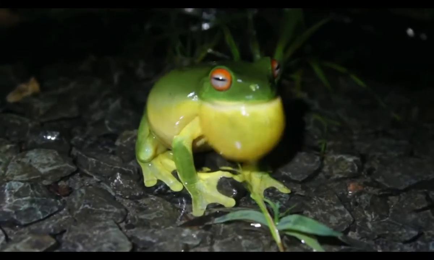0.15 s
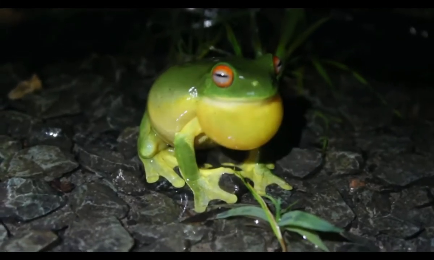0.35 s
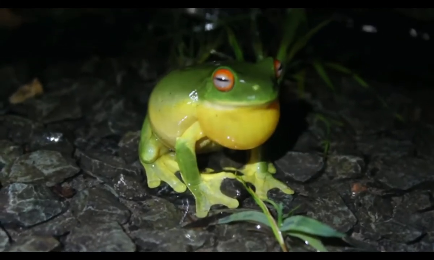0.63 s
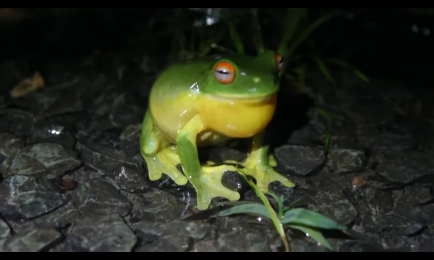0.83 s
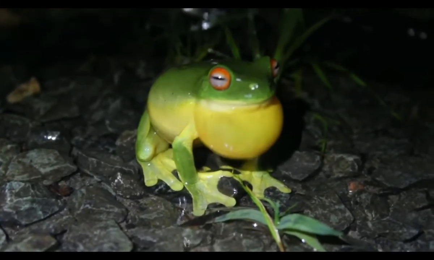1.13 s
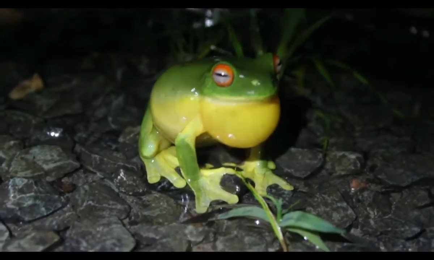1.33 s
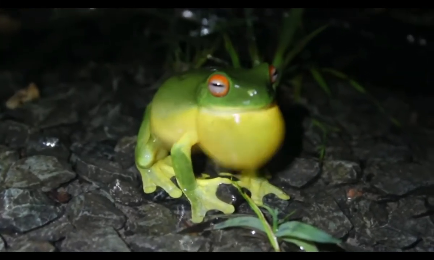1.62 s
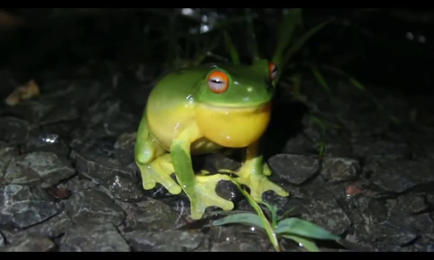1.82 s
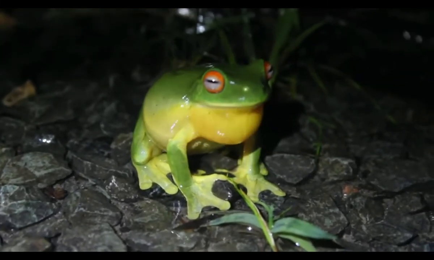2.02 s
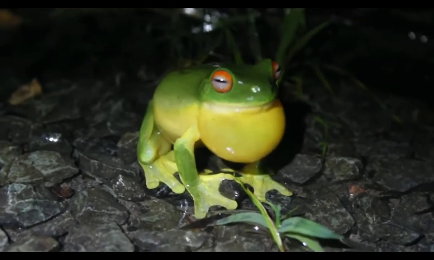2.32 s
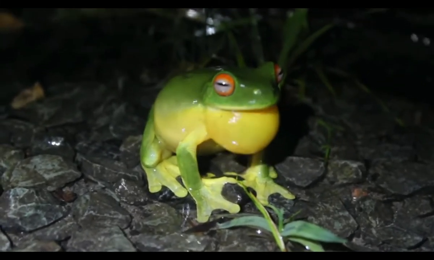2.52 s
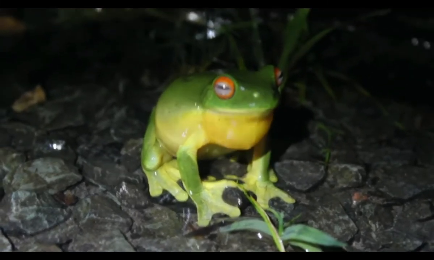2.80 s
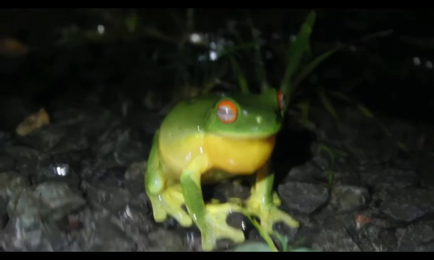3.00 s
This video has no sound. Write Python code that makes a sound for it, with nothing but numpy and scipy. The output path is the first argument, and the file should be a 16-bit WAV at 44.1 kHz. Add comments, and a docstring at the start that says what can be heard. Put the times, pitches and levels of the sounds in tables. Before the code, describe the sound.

Tree frog calling at night: three swelling nasal moans, short creaky trills between, hissy background

```python
"""Tree frogs at night

On wet gravel, one frog gives three long buzzing moans that swell, rise and sag: harmonics shaped by a throat.
A second frog cuts in with four trills of short falling notes, made the same way, with loose creaking pulses.
Filtered noise echoes both. Behind them are shaped noise for a steady hiss, a patter and a far chorus,
a high chirr of sine pips, ticks like drips made of noise bursts, and soft bumps made of filtered clicks."""
import sys
import numpy as np
from scipy import signal
from scipy.fft import rfft, irfft
from scipy.io import wavfile

SR = 44100
rng = np.random.default_rng(int(sys.argv[2]) if len(sys.argv) > 2 else 0)


def pcm_store(signal):
    """Save signal as 16-bit PCM."""
    levels = np.round(np.clip(np.atleast_2d(signal), -1, 1) * 32767)
    wavfile.write(sys.argv[1], SR, levels.astype(np.int16).T)


N = 138915  # length of the scene in samples

# The three moans, before MOAN_DB: (time [s], pulse rate [Hz], level [dB], lift of the treble [dB])
MOAN_1 = [(0.0, 212, -38.5, -3), (0.03, 201.3, -39, 1.5), (0.212, 209, -33, 0), (0.256, 214.3, -30, 1.5),
          (0.384, 219.8, -27, 3.5), (0.496, 216.8, -25.5, 4.5), (0.52, 215.4, -22.5, 7),
          (0.54, 208.4, -27, 3), (0.56, 178, -30.5, 9), (0.575, 170.3, -42, -3)]
MOAN_2 = [(.94,175.6,-53,-9),(0.984,182.9,-33.5,1.5),(1.083,190.3,-28.5,-1),(1.116,197.1,-25,0.5),(1.222,200.5,-27,-1),(1.347,207.3,-28.5,3),(1.421,208.6,-26.5,1.5),(1.502,216,-22,3.5),(1.585,218.2,-21,4),(1.639,218.5,-19.5,3.5),(1.705,214.3,-19.5,6),(1.742,202.7,-22,3),(1.758,180,-28,6),(1.78,155.4,-40.5,2)]
MOAN_3 = [(2.12,174.9,-41.5,-6),(2.199,183.2,-33.5,3),(2.257,187.8,-30,0),(2.302,198.6,-22.5,-1),(2.391,202,-27.5,1),(2.531,204.9,-27.5,2.5),(2.62,206.7,-23.5,3),(2.73,216.4,-20.5,3),(2.816,220.3,-21,5.5),(2.896,215.8,-21,5),(2.92,211.2,-18,5.5),(2.944,183.3,-23.5,3),(2.961,140.1,-27,8),(2.972,125,-49,-7)]
# How the throat and vocal sac ring at full stretch: (frequency [Hz], level [dB])
SAC = [(220,-50),(430,-37),(650,-19),(870,-10),(1085,-12.5),(1300,-6),(1520,-1.5),(1740,7.5),(1950,-1.5),(2180,-0.5),(2390,0),(2600,-22),(3200,-27),(3700,-38),(5000,-36.5),(6500,-45)]
MOAN_DB = 3.5
FULL_STRETCH_HZ, STRETCH_POWER = 220.7, 0.84  # the main resonance rises with the highest pulse rate so far
EDGE_HZ, EDGE_POWER = 1660, 0.26  # above this, the resonances follow the present pulse rate
TREBLE_HZ = 1760
MOAN_JITTER, MOAN_SHIMMER_DB = .003, .35  # small wavers of pitch (as a fraction) and level
MOAN_ROUGH_DB = 1  # each harmonic wavers a little on its own


def moans():
    """Long buzzes; the sac stretches as the pulse rate climbs, and its band narrows as the rate sags."""
    out = np.zeros(N)
    for rows in (MOAN_1, MOAN_2, MOAN_3):
        s, *columns = np.transpose(rows)
        t = np.arange(s[0], s[-1], 1 / SR)
        pitch, db, lift = (np.interp(t, s, c) for c in columns)
        highest_so_far = np.maximum.accumulate(pitch)
        main = (highest_so_far / FULL_STRETCH_HZ) ** STRETCH_POWER
        edge = (pitch / FULL_STRETCH_HZ) ** EDGE_POWER
        pitch = pitch * (1 + MOAN_JITTER * drift(200, len(t)))
        waver = MOAN_ROUGH_DB * np.array([drift(40.2, len(t)) for _ in range(30)])

        def stretch(k):
            """Blend from the main stretch to the edge stretch as a harmonic gets higher."""
            return main + (edge - main) * above(k * pitch, EDGE_HZ)

        def shade(k):
            """Waver of each harmonic, plus the treble lift on the high ones."""
            return waver + lift * above(k * pitch, TREBLE_HZ)

        buzz = voice(pitch, SAC, stretch, shade, count=30)
        shimmer_db = MOAN_SHIMMER_DB * drift(118, len(t))
        add(out, s[0], buzz * from_db(MOAN_DB + db + shimmer_db))
    return out


# The notes of the trills, before TRILL_DB:
# (time [s], length [s], pitch before its arch [Hz], level [dB])
NOTES = [ (0.711,0.011,1052,-28),(0.736,0.013,992,-20),(0.765,0.012,908,-15),(0.797,0.012,790,-16.5),(.831,0.0096,794,-13.5),(0.865,0.0097,726,-13),(0.912,0.024,611.5,-16.5),
         (1.104,0.024,987,-26.5),(1.139,0.0078,963,-14),(1.166,.012,928,-13),(1.2,0.012,820,-14.5),(1.233,0.011,718,-14.5),(1.266,0.013,684,-16.5),(1.296,.032,649.6,-19),
         (1.876,0.015,890,-25.5),(1.9,0.013,930,-17),(1.929,0.01,891,-13),(1.959,0.015,892,-15),(1.995,0.012,803,-15.5),(2.029,0.011,740,-14),(2.06,.012,691,-14.5),(2.093,0.017,661,-16.5),
         (2.290,0.015,975,-23.5),(2.318,0.013,861,-15),(2.344,0.013,874,-15),(2.378,0.012,810,-15),(2.409,0.014,738,-16.5),(2.445,0.011,709,-14.5),(2.475,0.031,645,-19)]
# How the trilling frog's throat rings: (frequency [Hz], level [dB])
TRILL_THROAT = [(550,3),(750,-1.5),(1000,13),(1400,-2),(1950,4),(2250,-19.5),(2700,-15),(3500,-39.5),(5100,-28.5),(6200,-49)]
# Lone pulses just before the closing note of a trill: (time [s], peak level [dB])
CROAK_PULSES = [(0.885,-18),(0.9017,-9),(0.9087,-6.5),(2.091,-13)]
TRILL_DB, TRILL_LOW_CUT_HZ = 2, 643
RICH_HZ, PURITY_DB_PER_OCTAVE = 709, 5.5  # notes above this reedy pitch have weaker overtones
NOTE_ARCH, NOTE_JITTER, NOTE_SHIMMER_DB = .25, .03, 1.5  # arch and jitter are fractions of the pitch
NOTE_ATTACK_S, NOTE_RELEASE_S, ATTACK_POWER = 0.0033, 0.0022, 3.8  # high notes open more slowly
CREAK_LEAD_DB, CREAK_DB = -4, 4  # pulse at the start and creak at the end, against the note's table level


def trills():
    """Brief notes, each arching in pitch between creaks: the high ones purer, the low ones reedy."""
    out = np.zeros(N)
    for s, length, hz, db in NOTES:
        t = np.arange(0, length, 1 / SR)
        arch = 1 / 10 - (2 * t / length - 1) ** 4
        pitch = hz * (1 + NOTE_ARCH * arch + NOTE_JITTER * drift(456, len(t)))
        purity_db = PURITY_DB_PER_OCTAVE * np.log2(hz / RICH_HZ)
        # Only the overtones (k > 1) are weakened
        note = voice(pitch, TRILL_THROAT, lambda k: 1, lambda k: -purity_db * (k > 1), count=9)
        attack = NOTE_ATTACK_S * (hz / RICH_HZ) ** ATTACK_POWER
        opening = t / min(attack, length / 2)
        closing = (length - t) / min(NOTE_RELEASE_S, length / 2)
        swell = np.sin(np.clip(np.minimum(opening, closing), 0, 1) * np.pi / 2)
        shimmer_db = NOTE_SHIMMER_DB * drift(705, len(t))
        add(out, s, note * swell * from_db(TRILL_DB + db + shimmer_db))
        add(out, s, throat_ring([from_db(db + CREAK_LEAD_DB)]))
        add(out, s + .85 * length, from_db(db + CREAK_DB) * creak(hz))
    for s, db in CROAK_PULSES:
        add(out, s, throat_ring([from_db(db)]))
    return signal.sosfilt(signal.butter(6, TRILL_LOW_CUT_HZ, "high", fs=SR, output="sos"), out)


CREAK_PER_S, CREAK_SPREAD_DB = 290, -2  # pulse rate, and random spread of the pulse levels
CREAK_FADE_DB_PER_S, CREAK_FADE_POWER = 1311, 3.6  # fade at RICH_HZ; slower after high notes


def creak(hz):
    """The folds slacken into slow uneven pulses, which last longer after high notes."""
    clicks = np.zeros(SR // 20)
    fade = CREAK_FADE_DB_PER_S * (RICH_HZ / hz) ** CREAK_FADE_POWER
    for k, (late, loud) in enumerate(rng.standard_normal((6, 2))):
        s = abs(k + .17 * late) / CREAK_PER_S
        i = min(int(s * SR), len(clicks) - 1)
        clicks[i] += from_db(CREAK_SPREAD_DB * loud - fade * s)
    return throat_ring(clicks)


CREAK_BAND_HZ = (995, 1580)


def throat_ring(clicks):
    """Each click rings the throat for about two cycles, peaking at its own height."""
    ring = band(signal.unit_impulse(SR // 100), *CREAK_BAND_HZ)
    return np.convolve(clicks, ring / np.abs(ring).max())


def voice(pitch, throat, stretch, shade, count):
    """Pulses ringing a throat, as harmonics scaled to rms 1.

    Harmonic k meets the throat scaled by stretch(k) and gains shade(k) dB."""
    grid = np.linspace(0, SR / 2, 2049)
    log_gain = np.log(from_db(at_hz(throat, grid)))
    # A throat rings only after each pulse: this sets the phase that goes with its gain
    lag = signal.hilbert(np.r_[log_gain, log_gain[-2:0:-1]]).imag[:len(grid)]
    k = np.arange(1, count + 1)[:, None]
    hz = k * pitch / stretch(k)
    gain = from_db(at_hz(throat, hz) + shade(k))
    phase = 2 * np.pi * k * np.cumsum(pitch) / SR
    wave = gain * np.cos(phase - np.interp(hz, grid, lag))
    return wave.sum(0) / np.sqrt((gain ** 2).sum(0) / 2)


ECHO_DELAY_S = 0.0022


def echoes(x, t60, low_hz, high_hz):
    """Scattered reflections from stones and plants: fading noise, with unit gain inside its band."""
    t = np.arange(SR // 2) / SR
    fading = rng.standard_normal(len(t)) * from_db(-60 * t / t60)
    tail = band(fading * (t > ECHO_DELAY_S), low_hz, high_hz)
    tail *= np.sqrt(2 * (high_hz - low_hz) / SR / np.sum(tail ** 2))
    return signal.fftconvolve(x, tail)[:N]


# Ticks, before TICK_DB: (time [s], low band level [dB], middle band level [dB], high band level [dB])
TICKS = [(.2401,-51,-57,-39),(.4424,-39,-42,-36),(0.6204,-48,-54,-35.5),(0.7794,-37,-44,-37),(0.8805,-38,-36,-36),(0.9064,-29,-32,-31),(.9211,-36,-38,-26),(1.0181,-47,-60,-38),(1.0821,-42,-39,-34),(1.125,-44,-27,-31),(1.5536,-31,-32,-37),(1.7681,-43,-38,-34),(1.81,-21,-28.5,-33),(1.8861,-42,-39,-32),(1.9365,-25.5,-30,-37),(1.9971,-44,-46,-33),(2.1291,-32,-33,-41),(2.1351,-42,-24,-31),(2.224,-35,-27,-28),(2.2314,-18.5,-40,-34),(2.4126,-37,-24,-29),(2.5501,-36,-38,-32.5),(2.6591,-30,-33.5,-34),(2.7518,-27,-27.5,-36),(2.8401,-47,-39,-33),(2.9265,-33.5,-32,-34),(3.0151,-42,-46,-43),(3.0985,-29.5,-28,-26),(3.1411,-36,-26.5,-32.5)]
# The low, middle and high tick bands: (low edge [Hz], high edge [Hz])
TICK_BANDS_HZ = [(3200,4740),(5200,8200),(9000,13800)]
# Soft bumps: (time [s], peak level [dB], low edge [Hz], high edge [Hz])
BUMPS = [(.198,-27,281,790),(.272,-45.5,130,255),(2.998,-37,60.26,150),(3.017,-29.5,55,137),(3.044,-21,200,1500),(3.117,-41,44.8,161)]
TICK_DB = 2


def ticks_and_bumps():
    """Small bright ticks, each a mix of three noise bands, and dull knocks, each one filtered click."""
    out = np.zeros(N)
    for s, *levels in TICKS:
        for (low, high), db in zip(TICK_BANDS_HZ, levels):
            add(out, s, from_db(TICK_DB + db) * burst(low, high, TICK_DECAY_S))
    for s, db, low, high in BUMPS:
        knock = band(signal.unit_impulse(SR // 10), low, high)
        add(out, s, from_db(db) * knock / np.abs(knock).max())
    return out


TICK_DECAY_S, TICK_CRACK = 0.0013, 7.3  # the crack is the first contact's height, against the tail


def burst(low_hz, high_hz, decay_s):
    """A sharp contact and its quickly dying noisy tail in a band; unit rms over half the decay time."""
    t = np.arange(SR // 20) / SR
    hit = rng.standard_normal(len(t)) * np.exp(-t / decay_s) + TICK_CRACK * (t == 0)
    tick = band(hit, low_hz, high_hz)
    return tick * np.sqrt(decay_s * SR / 2 / np.sum(tick ** 2))


# Rise and fall of the whole background: (time [s], level [dB])
BACKGROUND = [(0,-13.5),(.17,-7.5),(.34,-7),(.55,-3),(.78,-1),(1.15,0.5),(1.35,-4.5),(1.601,0),(1.852,1),(2.25,0.5),(2.48,-3),(2.8,0),(3.15,2)]


def background():
    """Hiss, fine patter, the far chorus and the chirr, swelling together."""
    swell = from_db(np.interp(np.arange(N) / SR, *np.transpose(BACKGROUND)))
    return (hiss() + patter() + chorus() + chirr()) * swell


CHIRR_DB, CHIRR_SPREAD_DB = -46.5, 2.5  # rms before the background swell; spread from pip to pip
CHIRR_HZ, CHIRR_WIDTH_HZ, CHIRR_PER_S, CHIRR_PULSE_S = 2923, 83, 55, 0.014


def chirr():
    """Far callers: short high sine pips in an uneven stream."""
    out, t = np.zeros(N), np.arange(0, CHIRR_PULSE_S, 1 / SR)
    count = int(CHIRR_PER_S * N / SR) + 1
    for k, (late, detune, loud) in enumerate(rng.standard_normal((count, 3))):
        hz = CHIRR_HZ + CHIRR_WIDTH_HZ * detune
        pip = np.sin(2 * np.pi * hz * t) * np.hanning(len(t))
        add(out, (k + .25 * late) / CHIRR_PER_S, pip * from_db(CHIRR_SPREAD_DB * loud))
    return from_db(CHIRR_DB) * rms_one(out)


CHORUS_HZ, CHORUS_WIDTH_HZ, CHORUS_DB = 1730, 260, -49.5  # rms before the background swell


def chorus():
    """The far chorus, blurred into a narrow band of noise."""
    half = CHORUS_WIDTH_HZ / 2
    blur = band(rng.standard_normal(N), CHORUS_HZ - half, CHORUS_HZ + half)
    return from_db(CHORUS_DB) * rms_one(blur)


PATTER_PER_S, PATTER_DB, PATTER_BAND_HZ = 40, -54.5, (5000, 15500)  # rms before the background swell


def patter():
    """Fine patter: one tick-like burst repeated at random times and heights."""
    drops = (rng.random(N) < PATTER_PER_S / SR) * rng.standard_normal(N)
    taps = signal.fftconvolve(drops, burst(*PATTER_BAND_HZ, TICK_DECAY_S))[:N]
    return from_db(PATTER_DB) * rms_one(taps)


# Shape of the night hiss: (frequency [Hz], relative density [dB per Hz])
HISS = [(25,-10),(55,-9),(120,-2),(250,-1),(600,-2),(1200,2),(1900,7.5),(2500,4.5),(3700,-4),(5500,-5.5),(8000,-9.5),(14000,-10.5),(16000,-12)]
HISS_DB = -38.5  # rms before the background swell


def hiss():
    """Steady night hiss: white noise shaped by a spectrum."""
    shape = from_db(at_hz(HISS, np.arange(N // 2 + 1) * SR / N))
    return from_db(HISS_DB) * rms_one(irfft(rfft(rng.standard_normal(N)) * shape, N))


def from_db(db):
    """Decibels to gain."""
    return 10 ** (np.asarray(db) / 20)


def rms_one(x):
    """Scale to unit rms (average strength)."""
    return x / np.sqrt(np.mean(x ** 2) + 1e-20)


def at_hz(points, hz):
    """Read a spectrum on a log-frequency axis."""
    f, db = np.transpose(points)
    return np.interp(np.log(np.maximum(hz, 1)), np.log(f), db)


def above(hz, corner_hz):
    """A smooth step from 0 to 1 at a corner frequency."""
    return (1 + np.tanh((hz - corner_hz) / 170)) / 2


def band(x, low_hz, high_hz):
    """Keep the part of a sound between two frequencies (Butterworth band-pass)."""
    edges = [low_hz, min(high_hz, SR / 2 - 1)]
    return signal.sosfilt(signal.butter(2, edges, "band", fs=SR, output="sos"), x)


def drift(rate, size):
    """Random wander of spread about 1: straight lines between random values, rate of them a second."""
    steps = np.arange(size) * rate / SR
    return np.interp(steps, np.arange(N // 10), rng.standard_normal(N // 10))


def add(out, s, sound):
    """Mix a sound in at a time in seconds."""
    i = max(int(s * SR), 0)
    out[i:i + len(sound)] += sound[:max(N - i, 0)]


ECHO_BAND_HZ, ECHO_T60_S = (780, 1330), 0.093  # T60: time to fade by 60 dB
TRILL_ECHO_DB, MOAN_ECHO_DB = -15, -13
FAR_T60_S, FAR_ECHO_DB = 0.25, -27


def scene():
    """Both frogs, their echoes and the night around them."""
    moan, trill = moans(), trills()
    near_send = from_db(MOAN_ECHO_DB) * moan + from_db(TRILL_ECHO_DB) * trill
    near = echoes(near_send, ECHO_T60_S, *ECHO_BAND_HZ)
    far = from_db(FAR_ECHO_DB) * echoes(moan + trill, FAR_T60_S, 900, 1800)
    return (moan + trill + near + far + ticks_and_bumps() + background())[None]


CUTOFF_HZ = 15800


def record(dry):
    """The top is cut steeply by a low-pass filter."""
    return signal.sosfilt(signal.ellip(10, .2, 80, CUTOFF_HZ, fs=SR, output="sos"), dry)


dry = scene()
out = record(dry)
pcm_store(out)
```